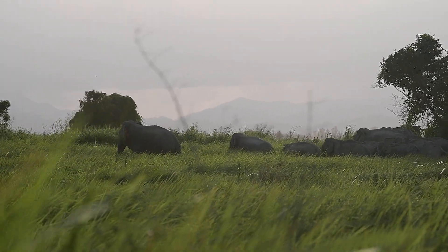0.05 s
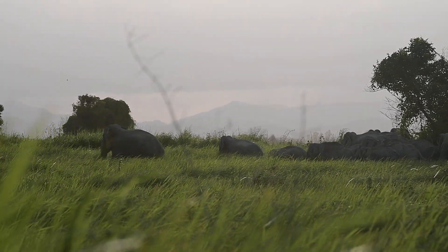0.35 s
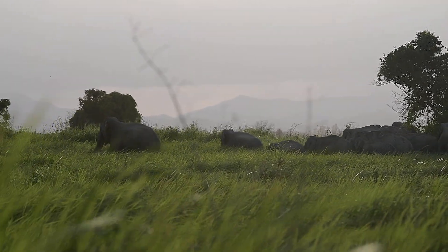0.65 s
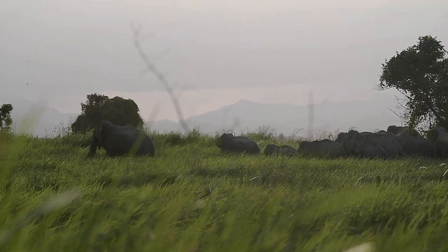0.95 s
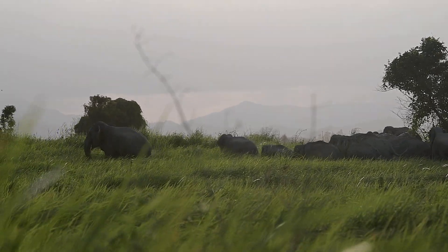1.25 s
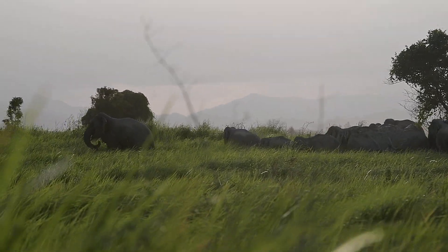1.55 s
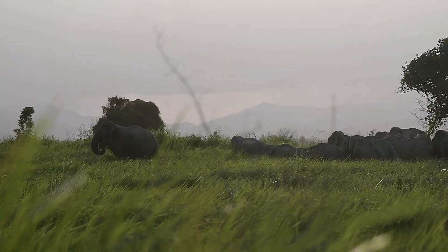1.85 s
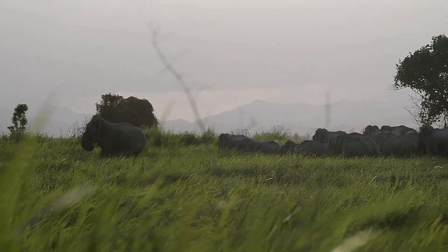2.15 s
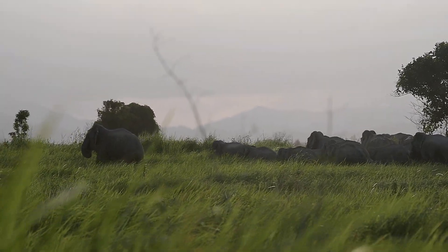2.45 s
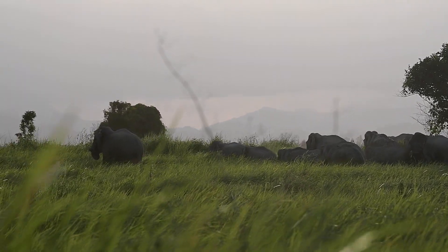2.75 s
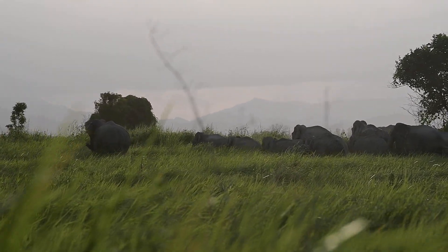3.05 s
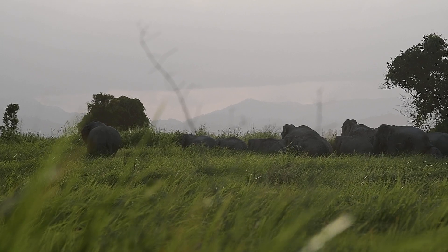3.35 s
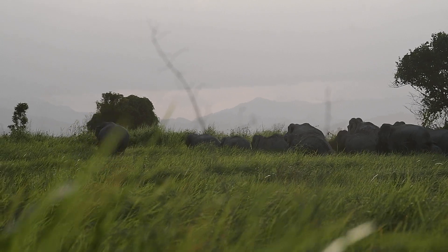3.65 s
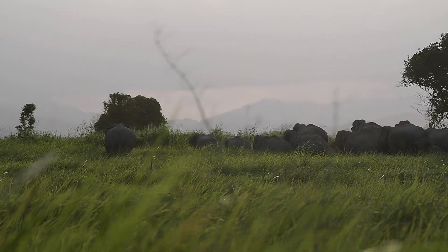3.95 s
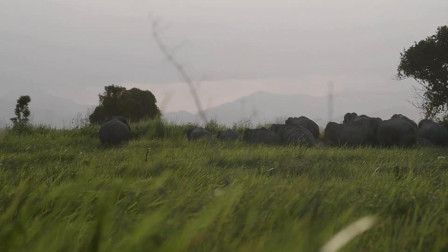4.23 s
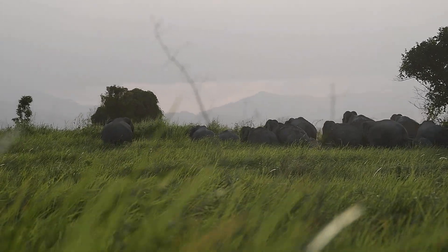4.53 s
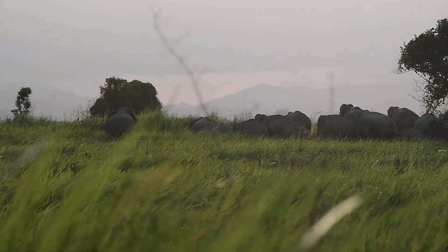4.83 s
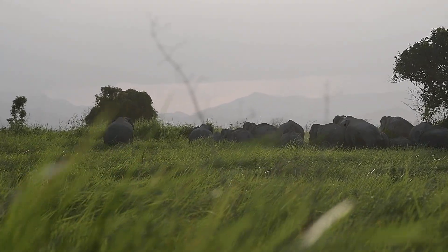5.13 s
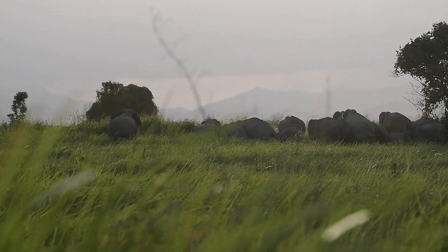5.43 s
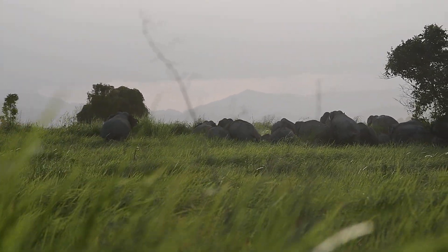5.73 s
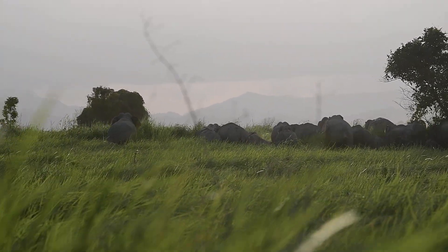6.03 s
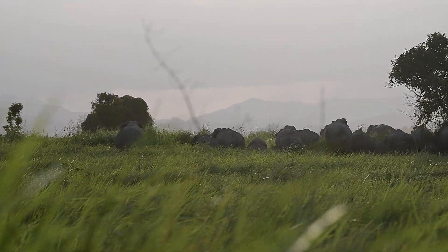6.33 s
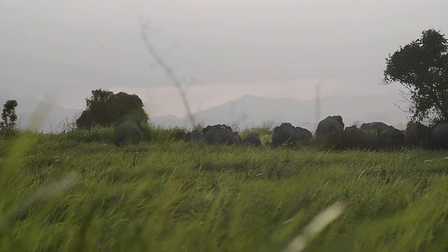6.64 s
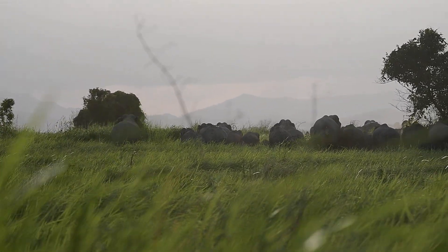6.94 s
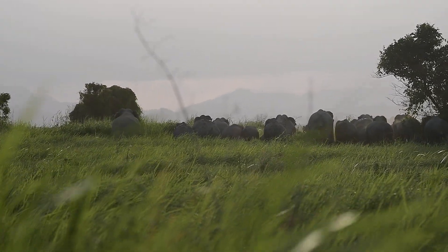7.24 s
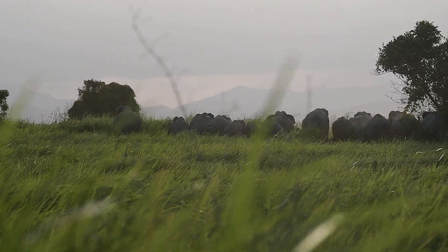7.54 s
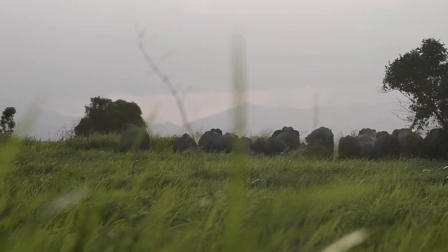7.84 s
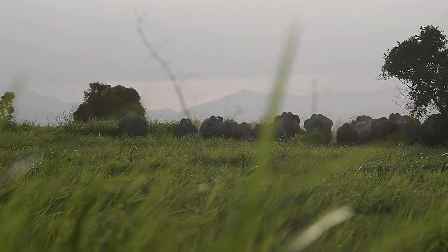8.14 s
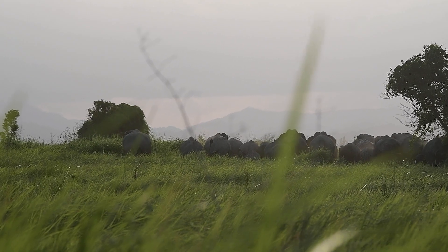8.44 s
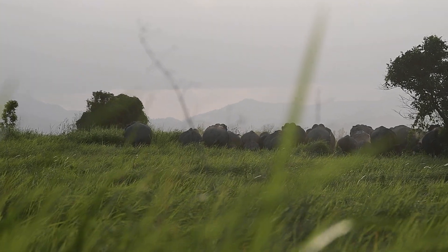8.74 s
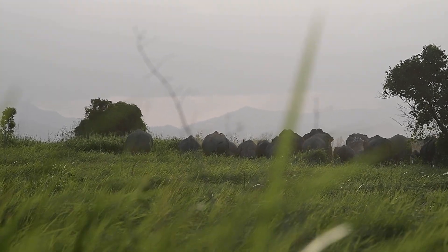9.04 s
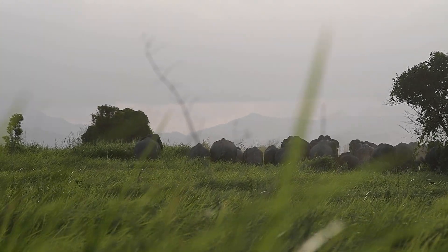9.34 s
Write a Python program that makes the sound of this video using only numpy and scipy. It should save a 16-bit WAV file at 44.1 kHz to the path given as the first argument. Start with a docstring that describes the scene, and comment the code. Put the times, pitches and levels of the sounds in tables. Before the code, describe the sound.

A wide, soft hiss of breeze through tall grass fills an open field, with a thin, quick cricket chirp and faint far-off wind behind it. Small dry snaps and rustles come from nearby stalks, along with three light handling knocks. Low wind puffs on the microphone, gentle at first, grow stronger in the second half and end as loud, crackling buffets that dominate everything.

```python
"""An open field of tall grass. From the start, blades hiss and tick over distant wind, a cricket chirps
in paired wing strokes and light puffs buffet the microphone. From about 2 s dry stalks snap and brush;
a far bird hoots faintly, and the camera takes three small knocks. After 6 s the wind freshens and the
blade tips fizz; past 8 s it hits hard, with popping eddies, and a far bird whistles thinly.
Throughout, two narrow notch filters cut slots in the treble."""
import sys
import numpy as np
from scipy import signal
from scipy.fft import rfft, irfft, next_fast_len
from scipy.io import wavfile
from scipy.ndimage import uniform_filter1d, map_coordinates

SR = 44100
rng = np.random.default_rng(int(sys.argv[2]) if len(sys.argv) > 2 else 0)


def generate_wav(signal):
    """Clip the signal to [-1, 1] and save it as 16-bit WAV at the path in sys.argv[1]."""
    frames = np.transpose(np.atleast_2d(signal))
    scaled = np.clip(frames, -1, 1) * 32767
    pcm = np.round(scaled).astype(np.int16)
    wavfile.write(sys.argv[1], SR, pcm)


N = 422478
TIME = np.arange(N) / SR

# Levels in all tables are relative: each layer adds its own gain.
# near dry stalks snapping: start_s, level_db, extra_treble_db, t60_s
SNAPS = [(1.936, -44, 0, .08), (2.2365, -38, -10, .02), (2.569, -41, -1, 0.016), (2.823, -41, 0, .015),
         (2.987, -41.5, -2, .02), (3.153, -39.5, -3, .012), (3.248, -40, -9, 0.0089),
         (3.3175, -41, -2, .015), (3.3547, -41, 8, .013), (3.373, -47, 11, .013), (3.936, -41.5, 6, 0.033),
         (3.958, -40, 0, .02), (4.267, -48, 16, .013), (4.68, -40, -2, .02), (4.874, -44, -4, 0.012),
         (4.9008, -39.5, -6, .011), (5.039, -40, 2, .013), (5.204, -42, 10, .013), (5.285, -40, -2, .05),
         (5.298, -39, -3, .02), (5.302, -42.5, -2, .02), (5.37, -41.5, -1, .02), (5.536, -42, 4, 0.015),
         (5.7797, -32.5, -1, .022), (6.575, -39.5, 6, 0.029), (6.6074, -44, 3, .02), (6.863, -53, -8, .02),
         (7.044, -43.5, 6, 0.04), (7.235, -41, -3, .015), (7.492, -45.5, 4, .09), (8.019, -42, 5, 0.014),
         (8.348, -43, 4, .02), (8.513, -40.5, 4, .015), (8.937, -41, 5, .013), (9.102, -41, 2, .015)]
# stereo image of the air and of the grass: frequency_hz, likeness (0 wide, 1 mono)
AIR_IMAGE = [(200, 1), (700, 0.91), (1300, 0.83), (2500, .1)]
GRASS_IMAGE = [(1200, 0), (2400, 0.27), (4400, 0.5), (6500, 0.16), (9000, 0.17), (14000, .05)]


def buffeting(level_db=0.16, knee_hz=320, db_per_octave=21, low_slope=1.85, steepness=1.94):
    """Turbulent pressure on the microphone; stronger flow holds smaller eddies, so it is brighter."""
    # treble loss on the sheltered right side: frequency_hz, gain_db
    shelter = [(120, 0), (250, -1.6), (450, -4.3), (750, -9.5), (1000, -14.5), (1500, -22)]
    gust_db = gusts() + level_db
    flutter = 1.5 * wobble(35) + 2.6 * wobble(170)
    flow_db = gust_db + flutter * np.interp(gust_db, [-40, -18], [1.0, .7])
    # spurts above the gust's mean get extra brightness, so they crackle
    drive_db = flow_db + .5 * np.clip(flow_db - gust_db, -8, 8)
    # a hump of noise follows the drive, cross-fading between half-octave steps
    knee_octave = np.clip(np.log2(knee_hz) + (drive_db + 35) / db_per_octave, 7, 10)
    hump = lambda u: (u / np.hypot(u, 0.3)) ** low_slope * np.exp(-u ** steepness)
    pressure, rumble = rng.standard_normal(N), 0
    for octave in np.arange(14, 21) / 2:
        band = filtered(pressure, lambda hz: hump(hz / 2 ** octave))
        rumble += np.maximum(1 - 2 * abs(knee_octave - octave), 0) * unit(band)
    low_cut = signal.butter(2, 64, "highpass", fs=SR, output="sos")
    left = signal.sosfilt(low_cut, amp(flow_db) * rumble + eddies())
    right = np.roll(coloured(left, shelter), shift=1)  # duller and a hair later
    return np.array([left, right])


def gusts(rise_db_per_s=1096, fall_db_per_s=750):
    """Wind envelope in dB: each puff rises fast, holds and falls back into the draught."""
    # light draught between puffs: time_s, level_db
    draught = [(0, -69), (0.25, -69), (1.15, -74), (1.7, -60), (2.1, -63), (2.7, -69), (3.3, -62),
               (4.2, -76), (5.0, -60), (5.5, -76), (5.8, -53.5), (6.15, -64), (6.9, -55), (7.4, -46),
               (7.85, -56.5), (8.55, -45), (9.58, -50)]
    # puffs on the microphone: start_s, hold_s, level_db
    puffs = [(0.027, 0.074, -53.5), (0.424, 0.1, -56), (0.555, 0.05, -54), (0.656, 0.031, -52.5),
             (1.348, 0.081, -54), (1.472, 0.016, -50), (1.61, 0.03, -56), (1.705, 0.075, -56.5),
             (2.149, 0.075, -49.5), (2.273, 0.031, -51), (2.364, 0.074, -56), (2.8, 0.06, -52),
             (2.929, 0.024, -48), (3.05, 0.12, -57.5), (3.17, 0.097, -52.5), (5.147, 0.082, -55),
             (5.616, 0.11, -54), (5.758, 0.036, -44), (6.278, 0.027, -46), (6.337, 0.079, -42.5),
             (6.509, 0.12, -42), (6.727, 0.02, -32.5), (6.79, 0.021, -39.5), (7.061, 0.035, -43),
             (7.129, 0.068, -34.5), (7.314, 0.041, -46), (7.542, 0.052, -37), (7.806, 0.0067, -46),
             (7.977, 0.031, -37.5), (8.099, 0.011, -40.5), (8.293, 0.074, -35), (8.371, 0.03, -26.5),
             (8.399, 0.0096, -18.5), (8.441, 0.035, -19), (8.544, 0.016, -22), (8.576, 0.29, -27),
             (8.606, 0.032, -20), (8.665, 0.0084, -19), (8.69, 0.023, -26.5), (8.741, 0.028, -21.5),
             (8.793, 0.036, -23), (8.891, 0.033, -22), (8.945, 0.06, -34.5), (9.068, 0.11, -35),
             (9.378, .09, -34.5), (9.516, 0.015, -16.5), (9.569, .03, -29.5)]
    power = amp(curves(draught)[0]) ** 2
    for s, hold, db in puffs:
        near = slice(max(int((s - .2) * SR), 0), int((s + hold + .3) * SR))
        t = TIME[near] - s
        below_db = rise_db_per_s * np.maximum(-t, 0) + fall_db_per_s * np.maximum(t - hold, 0)
        power[near] += amp(db - below_db) ** 2
    return 10 * np.log10(power)


def eddies(spit_db=-24, spit_ratio=3.4):
    """A hard eddy is one push and pull of pressure with a faint, finer spit; smaller ones pop higher."""
    # hardest eddies on the microphone: time_s, level_db, pitch_hz
    hits = [(0.004, -44, 158), (0.071, -51, 190), (0.509, -37.5, 144), (0.56, -48, 170), (0.585, -43, 130),
            (1.81, -41.5, 150), (1.878, -42.5, 164), (2.279, -35.5, 140), (2.936, -38, 168),
            (3.126, -41, 140), (5.693, -38, 187), (7.163, -22.5, 283), (7.578, -24.5, 170),
            (7.974, -38, 258), (8.354, -17.5, 220), (8.384, -15, 603), (8.396, -28, 500), (8.407, -22, 580),
            (8.416, -14, 407), (8.433, -11.5, 436), (8.453, -9.5, 410), (8.46, -15, 540), (8.474, -26, 487),
            (8.543, -22, 360), (8.576, -19, 190), (8.603, -15, 470), (8.627, -14.5, 433), (8.652, -20, 500),
            (8.664, -9.5, 440), (8.705, -21, 560), (8.716, -23, 480), (8.74, -20, 540), (8.747, -15, 430),
            (8.764, -16, 600), (8.809, -26, 443), (8.833, -18, 450), (8.917, -16.5, 428),
            (8.946, -18.5, 350), (9.503, -21, 360), (9.517, -13, 284), (9.5213, -10, 570), (9.527, -8, 350),
            (9.531, -8.5, 294), (9.543, -19, 200), (9.571, -18, 276)]
    out = np.zeros(N)
    pop = lambda u: u * np.exp((1 - u ** 2) / 2)
    for s, db, hz in hits:
        near = slice(max(int((s - .01) * SR), 0), int((s + .01) * SR))
        phase = 2 * np.pi * hz * (TIME[near] - s)
        out[near] += amp(db) * (pop(phase) + amp(spit_db) * pop(spit_ratio * phase))
    return out


def grass(level_db=2.0, ticks_per_s=140, tick_db=-6.0, scatter_db=2, tick_decay_s=0.0027):
    """Countless blades rub into a hiss; the nearer ones stand out as tiny ticks."""
    # breeze in the grass: time_s, level_db
    breeze = [(0.0, -53.5), (0.33, -53.5), (0.56, -51.2), (0.75, -53.5), (1.02, -53.5), (1.62, -51),
              (1.92, -51), (2.05, -52), (2.75, -51), (2.88, -50.5), (3.42, -52), (3.92, -51), (4.12, -53.5),
              (4.32, -52), (4.7, -51), (5.35, -51), (5.67, -53), (6.45, -52), (7.1, -51), (7.5, -52),
              (7.7, -52.5), (8.7, -52), (9.58, -53.2)]
    # tone of the hiss on each side: frequency_hz, gain_db
    left_eq = [(500, -30), (1200, -6), (2100, -2.5), (3000, -1), (3600, -0.5), (4900, -1), (5700, -0.5),
               (6700, -2.5), (7200, -5.5), (8700, -9.5), (11000, -10.5), (13000, -21), (15000, -24),
               (15700, -38)]
    right_eq = [(500, -28), (1200, -3), (1900, -0.5), (2520, 7), (2950, 0), (3250, 2), (4000, -2),
                (5000, 5), (6700, 3.5), (7200, -8), (8600, -6), (10300, -15.5), (12000, -19.5),
                (15500, -26.5)]
    touching = rng.random(N) < ticks_per_s / SR
    size = np.minimum(rng.standard_normal(N), 2)
    touches = touching * amp(tick_db + scatter_db * size)
    ticks = signal.lfilter([1], [1, -np.exp(-1 / (tick_decay_s * SR))], touches)
    left, right = paired(patchy(depth_db=0.99) + ticks * rng.standard_normal((2, N)), GRASS_IMAGE)
    hiss = unit(np.array([coloured(left, left_eq), coloured(right, right_eq)]))
    return amp(curves(breeze)[0] + level_db + 0.12 * wobble(13)) * hiss


def stalks(crack_db=1, ring_db=2.0, pan_right_db=4):
    """Dry stalks snap sharply and blades brush past each other; the grass between dulls their top."""
    # blades brushing: start_s, level_db, t60_s
    brushes = [(2.238, -43.5, 0.26), (2.567, -51, 0.43), (5.285, -47, 0.2), (6.575, -46, 0.2),
               (6.607, -49.5, 0.46), (6.863, -44, 0.15)]
    # tone of a snap, tone of a brush, loss through the grass: frequency_hz, gain_db
    snap_eq = [(600, -32), (1750, -13), (2600, -3), (3200, -4.5), (3700, -7), (4200, -5), (4950, -2),
               (5500, -0.5), (7000, -9), (11000, -18), (15000, -52)]
    brush_eq = [(600, -30), (1200, -15), (1800, -4), (2600, -2.5), (3500, -1.5), (4300, -5), (5500, -4),
                (7000, -7), (11000, -28), (15000, -47)]
    through_grass = [(10500, 0), (12000, -5), (13500, -22)]
    crackle = stereo_noise(GRASS_IMAGE, snap_eq)
    brushing = decays(brushes) * stereo_noise(GRASS_IMAGE, brush_eq)
    snaps = SNAPS + faint_snaps()
    treble = coloured(crackle, [(5000, -30), (8000, 0)])
    cracks = decays([(s, db, t60) for s, db, _, t60 in snaps]) * (crackle - treble)
    cracks += decays([(s, db + treble_db, t60) for s, db, treble_db, t60 in snaps]) * treble
    near = amp(crack_db) * cracks + amp(ring_db) * stalk_ring() + brushing
    return coloured(near, through_grass) * amp([[-pan_right_db / 2], [pan_right_db / 2]])


def stalk_ring(detune=.04):
    """Each near snap sets its hollow stalk ringing briefly, at a pitch of its own."""
    # modes of a hollow stalk: pitch_hz, level_db, t60_s
    modes = [(2770, -10, 0.022), (4960, -8, 0.018)]
    out, t = np.zeros(N + SR), np.arange(SR // 16) / SR
    for (s, db, _, _), size in zip(SNAPS, rng.standard_normal(len(SNAPS))):
        for hz, mode_db, t60 in modes:
            tone = np.sin(2 * np.pi * hz * (1 + detune * size) * t)
            out[int(s * SR):][:len(t)] += amp(db + mode_db) * 1000 ** (-t / t60) * tone
    return out[:N]


def faint_snaps(snaps_per_s=1.5, level_db=-45, scatter_db=1, t60_s=.013):
    """Farther stalks snap weakly at random moments; rows as in SNAPS."""
    chance = rng.random((64, 2))
    times = np.cumsum(-np.log(1 - chance[:, 0])) / snaps_per_s
    levels = level_db + scatter_db * (2 * chance[:, 1] - 1)
    return [(s, db, 0, t60_s) for s, db in zip(times, levels) if s < N / SR]


def knocks(click_db=-3, click_t60_s=0.026, ring_hz=235, ring_t60_s=0.053):
    """Small knocks on the camera: a short click, then the low ring of its case."""
    # knocks: start_s, level_db
    hits = [(2.236, -49), (4.938, -39), (5.608, -45)]
    # tone of the click: frequency_hz, gain_db
    case_eq = [(100, -9), (400, -4), (900, 0), (1700, 1), (2600, -12), (4000, -22), (7000, -40)]
    click = decays([(s, db + click_db, click_t60_s) for s, db in hits]) * stereo_noise(AIR_IMAGE, case_eq)
    ring = sum(decays([(s, db, ring_t60_s)]) * np.sin(2 * np.pi * ring_hz * (TIME - s)) for s, db in hits)
    return click + ring


def cricket(pitch_hz=8210, fall_hz=125, level_db=-7.5, right_db=-6, tail_db=-2, tail_t60_s=.22):
    """Two wing strokes a chirp, each sliding down in pitch; the grass scatters them into a short tail."""
    # loudness of the song: time_s, level_db
    fader = [(0, -50.5), (2.5, -52.5), (6.4, -52), (9.5, -49.5)]
    first_s, period_s, gap_s, stroke_s = .146, .2013, .047, .012
    song, t = np.zeros(N + SR), np.arange(-SR // 32, SR // 32) / SR
    chirps = np.arange(first_s, N / SR, period_s)
    for s in np.sort(np.r_[chirps, chirps + gap_s]):
        late, strength, sharp = rng.standard_normal(3)
        hz = pitch_hz + 25 * sharp - fall_hz * np.tanh(t / stroke_s)
        wing = amp(0.3 * strength) * np.exp(-(t / stroke_s) ** 2) * glide(hz)
        song[int((s + t[0] + .0015 * late) * SR):][:len(t)] += wing
    rasp_db = 2.0 * wobble(300)
    song = song[:N] * amp(curves(fader)[0] + level_db + rasp_db)
    t = np.arange(SR // 4) / SR
    tail = rng.standard_normal((2, len(t))) * 1000 ** (-t / tail_t60_s)
    scattered = signal.fftconvolve(song[None], tail / np.linalg.norm(tail[0]), axes=1)[:, :N]
    return song * amp([[0], [right_db]]) + amp(tail_db) * scattered


def birds(level_db=-1):
    """Two thin calls from far off, a low hoot and a high whistle, wavering in the moving air."""
    # contour of each call: time_s, pitch_hz, level_db
    hoot = [(1.97, 787, -80), (2.03, 810, -65), (2.11, 792, -67), (2.18, 760, -78)]
    whistle = [(8.93, 3990, -80), (8.98, 4000, -59), (9.07, 4000, -57), (9.105, 4060, -59),
               (9.14, 4080, -56), (9.18, 4110, -80)]
    waver_db, waver_hz = 1.5 * wobble(60), 6 * wobble(120)
    out = 0
    for call in (hoot, whistle):
        hz, db = curves(call)
        sounding = (TIME > call[0][0]) & (TIME < call[-1][0])
        out += sounding * amp(db + level_db + waver_db) * glide(hz + waver_hz)
    return out


def fizz(grain_db=2.5):
    """As the wind freshens, the tips of the nearest blades add a fine, grainy fizz."""
    # swell of the fizz: time_s, level_db
    swell = [(0, -100), (6.0, -92), (7.5, -82), (8.4, -71), (9.58, -75)]
    # tone of the blade tips: frequency_hz, gain_db
    tips_eq = [(7000, -30), (10000, -1), (12300, 0), (15500, -12)]
    grain = unit(amp(grain_db * wobble(200)))
    return amp(curves(swell)[0]) * grain * stereo_noise(GRASS_IMAGE, tips_eq)


def far_wind(level_db=11.0):
    """A soft, even bed of wind rushing through distant trees."""
    # swell of the rush: time_s, level_db
    swell = [(0, -72), (1.2, -73.5), (2.4, -72), (3.0, -73), (3.3, -68.5), (3.7, -70.5), (4.2, -73),
             (9.5, -71.5)]
    # tone of the rush: frequency_hz, gain_db
    air_eq = [(20, -2), (60, 8.5), (200, 3), (400, 0.5), (600, -1.5), (850, 2), (1150, -5), (1700, -14),
              (3000, -33), (8000, -60)]
    rush = paired(patchy(depth_db=-0.2), AIR_IMAGE)
    return amp(curves(swell)[0] + level_db) * unit(coloured(rush, air_eq))


def amp(db):
    """Decibels to gain."""
    return 10 ** (np.asarray(db) / 20)


def unit(x):
    """Scale to rms 1."""
    return x / np.sqrt(np.mean(x ** 2) + 1e-20)


def along(points, hz):
    """Read (frequency_hz, value) points on a log axis."""
    frequencies, values = np.transpose(points)
    return np.interp(np.log(hz + 1), np.log(frequencies + 1), values)


def curves(rows):
    """Automation: one value per sample for each column after the time."""
    times, *columns = np.transpose(rows)
    return [np.interp(TIME, times, column) for column in columns]


def wobble(knots_per_s):
    """A smooth random curve."""
    return map_coordinates(rng.standard_normal(int(N * knots_per_s / SR) + 4), [TIME * knots_per_s])


def glide(hz):
    """A sine that follows a pitch curve."""
    return np.sin(2 * np.pi * np.cumsum(hz) / SR)


def filtered(x, response):
    """Apply a gain given as a function of frequency."""
    size = next_fast_len(N + 8192, True)
    return irfft(rfft(x, size) * response(np.fft.rfftfreq(size, 1 / SR)), size)[..., :N]


def coloured(x, eq):
    """Equalise by (frequency_hz, gain_db) points."""
    return filtered(x, lambda hz: amp(along(eq, hz)))


def paired(x, image):
    """Mix two unrelated signals as mid and side into a left and right of given likeness."""
    angle = lambda hz: np.arccos(np.clip(along(image, hz), -1, 1)) / 2
    mid, side = filtered(x, lambda hz: np.array([np.cos(angle(hz)), np.sin(angle(hz))]))
    return np.array([mid + side, mid - side])


def stereo_noise(image, eq):
    """Noise of given width and tone, at rms 1."""
    return unit(coloured(paired(rng.standard_normal((2, N)), image), eq))


def patchy(depth_db):
    """Two white noises with drifting patches of gain in time and frequency."""
    spectra = signal.stft(rng.standard_normal((2, N)), nperseg=512)[2]
    patches = uniform_filter1d(rng.standard_normal(spectra.shape[1:]), size=6, axis=0)
    patches = uniform_filter1d(patches, size=16, axis=1)
    return signal.istft(spectra * amp(depth_db * unit(patches)), nperseg=512)[1][:, :N]


def decays(rows):
    """Envelope of sharp attacks that die away, from (start_s, level_db, t60_s) rows."""
    envelope, t = np.zeros(N + SR), np.arange(SR // 2) / SR
    attack = 1 - np.exp(-t / .0002)
    for s, db, t60 in rows:
        envelope[int(s * SR):][:len(t)] += amp(db) * attack * 1000 ** (-t / max(t60, .002))
    return envelope[:N]


def scene():
    """The wind on the microphone and the field around it."""
    return buffeting() + far_wind() + grass() + stalks() + knocks() + cricket() + birds() + fizz()


def record(dry, top_hz=15700):
    """The microphone's colour, two deep notches in the treble, then the band limit."""
    # peaks and dips of the microphone: centre_hz, half_width_hz, gain_db
    capsule = [(2936, 135, 3.5), (3250, 73, -5), (3640, 590, 1), (3980, 50, -2.5), (5356, 56, -9)]
    # treble notches: centre_hz, half_width_hz
    notches = [(7650, 230), (9610, 395)]

    def response(hz):
        bell = lambda centre, width: np.exp(-((hz - centre) / width) ** 2)
        colour = amp(sum(db * bell(centre, width) for centre, width, db in capsule))
        slots = np.prod([1 - bell(centre, width) for centre, width in notches], axis=0)
        return colour * slots * (hz < top_hz)
    return filtered(dry, response)


dry = scene()
out = record(dry)
generate_wav(out)
```